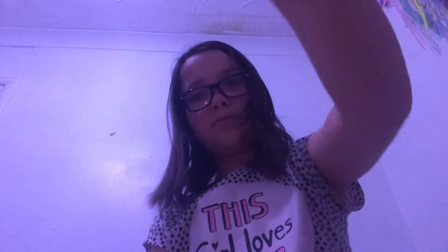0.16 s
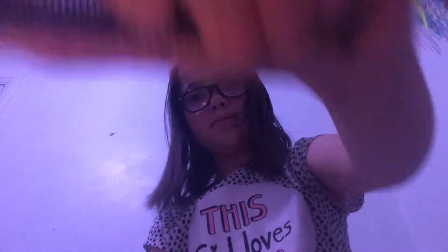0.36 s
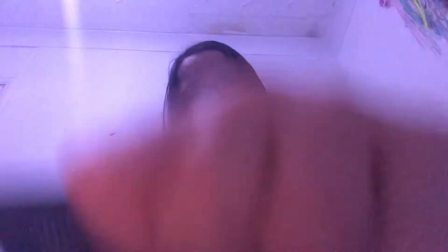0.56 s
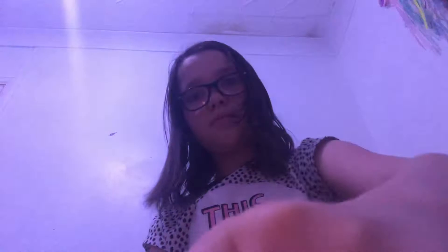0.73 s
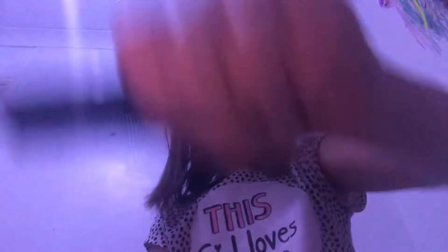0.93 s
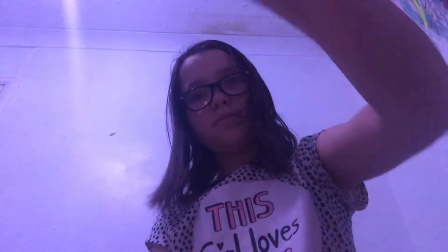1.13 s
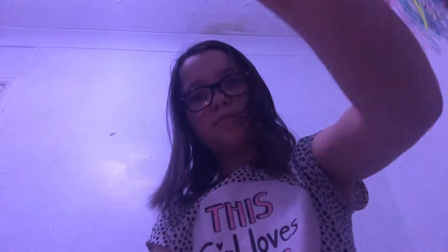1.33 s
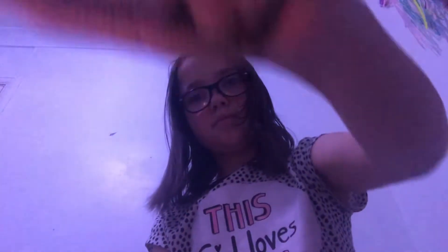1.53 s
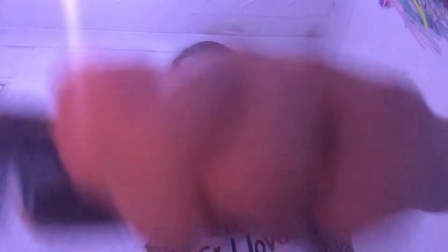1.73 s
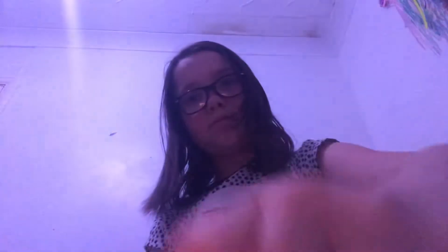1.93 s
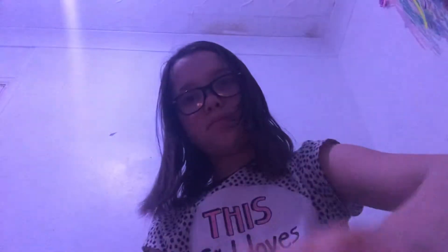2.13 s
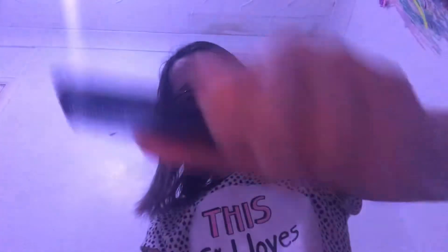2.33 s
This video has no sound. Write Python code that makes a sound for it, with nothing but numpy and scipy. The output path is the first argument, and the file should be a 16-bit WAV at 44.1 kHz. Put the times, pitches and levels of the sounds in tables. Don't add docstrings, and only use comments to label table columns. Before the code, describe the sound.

Comb teeth snap in two fast, ratchety bursts right at the microphone over a low hum

```python
import sys
import numpy as np
from scipy import signal
from scipy.fft import rfft, irfft
from scipy.io import wavfile
from scipy.ndimage import uniform_filter1d, minimum_filter1d

SR = 44100
rng = np.random.default_rng(int(sys.argv[2]) if len(sys.argv) > 2 else 0)


def wav_record(signal):
    frames = np.transpose(np.atleast_2d(signal))
    bounded = np.clip(frames, -1, 1)
    quanta = np.round(bounded * 32767).astype(np.int16)
    wavfile.write(sys.argv[1], SR, quanta)


def invert_db(x):
    u = np.asarray(x, float) / 20
    return 10 ** u


N = 108618
LEAD = 32

# frequency in Hz, level in dB.
SHUT_GATE = [(110, 1.5), (200, -7.5), (600, -7.5), (2000, -8), (6000, -11.5), (10000, -6.5), (16000, -2.5)]


def read(points, hz):
    f, value = np.transpose(points)
    return np.interp(np.log(hz + 1), np.log(f + 1), value)


def colour(x, points):
    gain = invert_db(read(points, np.fft.rfftfreq(len(x), 1 / SR)))
    return irfft(rfft(x) * gain, len(x))


def mode(f, hz, width_hz):
    return 1j * f * width_hz / (hz ** 2 - f ** 2 + 1j * f * width_hz)


def add(mix, s, sound):
    part = mix[round(s * SR) - LEAD:][:len(sound)]
    part += sound[:len(part)]


def snap(db, tooth_hz, ring_db, panel_db, panel_hz, dead_hz, spine_db, treble_db, chance, close):
    # frequency in Hz, level in dB.
    tick = [(200, -14), (600, -18.5), (2000, -9.5), (4000, -7), (7800, -7.5), (10000, -18), (13500, -14.5),
            (16000, -22)]
    # frequency in Hz, width in Hz, level in dB.
    spine = [(3740, 714, -7), (4870, 260, -10), (7710, 860, -11.5)]
    f = np.fft.rfftfreq(1024, 1 / SR)
    t = (np.arange(1024) - LEAD) / SR

    def delay(s):
        return np.exp(-2j * np.pi * f * s)

    first_bounce = 0.2 * delay(0.000214 * (1 + 0.2 * chance[0]))
    second_bounce = 0.66 * delay(0.00033 + 0.0001 * chance[4])
    body = invert_db(read(tick, f)) * (1 - first_bounce + second_bounce)
    for (hz, width_hz, spine_mode_db), c in zip(spine, chance[1:4]):
        body = body + invert_db(spine_mode_db + spine_db + 0.71 * c) * mode(f, hz * (1 + 0.026 * c), width_hz)
    body = invert_db(treble_db * np.clip(np.log2((f + 1) / 3500), 0, 1)) * body
    fall_db = np.where(f < panel_hz, 15, 14)
    body = body + invert_db(panel_db - fall_db * np.log2((f + 1) / panel_hz) ** 2)

    lag_s = 0.000887 * (1000 / np.maximum(f, 150.0)) ** 1.103
    late = np.exp(-2j * np.pi * np.cumsum(lag_s + LEAD / SR) * f[1])
    ring = irfft(invert_db(4.5 + ring_db) * mode(f, tooth_hz, 200) * late)
    damp_s = 0.0036
    damped_ring = ring / (1 + (np.maximum(t, 0) / damp_s) ** 12)
    whole = rfft(damped_ring) - body * late

    # frequency in Hz, width in Hz, depth
    nulls = []
    for beside, c in zip((0.832, 1.11), chance[5:]):
        nulls.append((tooth_hz * beside, 173, np.clip(0.41 + 0.23 * c, 0, 1)))
    nulls.append((dead_hz * (1 + 0.02 * chance[2]), 450, 0.92))
    nulls.append((9850 * (1 + 0.02 * chance[3]), 900, 0.92))
    for hz, width_hz, depth in nulls:
        whole = whole * (1 - close * depth * mode(f, hz, width_hz))
    return invert_db(db - 13.0) * 40 * irfft(whole)


def thump(hz, db):
    t = np.arange(3000) / SR
    peak_s = 0.0069
    swell = np.e * t / peak_s * np.exp(-t / peak_s)
    return invert_db(db) * swell * np.sin(2 * np.pi * hz * t)


def comb(chance, close):
    # start in seconds, peak in dB, tooth pitch in Hz,
    # tooth ring in dB, panel in dB.
    stroke_1 = [(0.2593, -30, 2980, 5.5, 2), (.277, -29, 2920, 3, 2), (0.3689, -22, 2850, -3.5, 1.5),
                (0.3855, -19, 3620, 0, 0), (.411, -21, 3290, -1.5, 1.5), (0.4467, -22.5, 2990, 4.5, 3),
                (0.4722, -21, 3050, 0.5, 0), (0.4925, -21.5, 2960, 4, 1.5), (0.5638, -21.5, 2950, 1.5, -7),
                (0.5861, -20.5, 2820, 3, -7), (0.6073, -20.5, 2940, 1.5, -6.5),
                (0.6466, -21.5, 2730, 2.5, -8.5), (0.7075, -24, 2690, 2, -4.5)]
    stroke_2 = [(1.2662, -38.5, 3140, 2.5, 1), (1.3549, -32.5, 3220, 8.5, -2.5),
                (1.378, -37.5, 3080, 8, 4.5), (1.557, -24, 2970, 3, -8), (1.5745, -24, 2820, 5.5, -7.5),
                (1.594, -19.5, 2830, 2.5, -9.5), (1.615, -22, 2650, 4, -6), (1.6395, -19, 2760, 0, -6.5),
                (1.665, -19.5, 2590, 2.5, -5.5), (1.697, -21.5, 2590, 2, -3.5),
                (1.736, -22.5, 2540, 2.5, 1), (1.833, -24.5, 2620, 5.5, 1), (1.851, -24.5, 2475, 2.5, 0.5)]
    touches = [
        (0.2097, -40, 3360, -6, 1),
        (0.773, -42, 3000, -7, -15),
        (0.816, -44.5, 3140, -5, -9),
        (1.9912, -39.5, 2760, 1, -7),
        (2.002, -47, 2720, -4, 1),
        (2.4185, -43, 3440, -10, 24.5),
    ]
    # start in seconds, panel pitch in Hz, dead spot in Hz,
    # spine in dB, treble in dB.
    grips = [(0, 1550, 5800, -2, -5.5), (.3, 1350, 5370, -7, 0.5), (.54, 1200, 5440, -3, 1),
             (.63, 860, 5730, -6, -3), (1.2, 1320, 4770, 3, -4), (1.5, 1090, 4680, 4, -4),
             (1.68, 810, 6140, -2, -6), (1.9, 520, 4550, -3, -3.5), (2.3, 446, 5600, -5.5, -8)]
    # start in seconds, pitch in Hz, level in dB.
    thumps = [(.455, 110, -50.5), (.494, 164, -54), (1.598, 129, -54), (1.834, 160, -58), (1.85, 170, -55)]
    out = np.zeros(N)
    for row, c in zip(stroke_1 + stroke_2 + touches, chance):
        grip = [g for g in grips if g[0] <= row[0]][-1]
        add(out, row[0], snap(*row[1:], *grip[1:], c, close))
    for s, hz, db in thumps:
        add(out, s, close * thump(hz, db))
    return signal.lfilter(*signal.butter(2, 65, "high", fs=SR), out)


def room(x):
    # frequency in Hz, level in dB.
    sent_colour = [(300, 3.5), (1200, -4), (3000, -2.5), (5800, 2.5), (8000, -1.5), (13000, 2.5)]
    # frequency in Hz, time in seconds.
    dying_time = [(300, 0.71), (3000, 0.48), (12000, 0.57)]
    hz, t, z = signal.stft(rng.standard_normal(SR // 2), SR, nperseg=256)
    fading = z * invert_db(-60 * t / read(dying_time, hz)[:, None])
    tail = signal.istft(fading, SR, nperseg=256)[1]
    tail = tail * np.clip((np.arange(len(tail)) / SR - 0.003) / 0.0027, 0, 1)
    echo = signal.fftconvolve(colour(x, sent_colour), tail / np.linalg.norm(tail))[:N]
    return invert_db(-21) * echo


def waver():
    t = np.arange(N) / SR
    return sum(np.sin(2 * np.pi * (f * t + rng.random())) / np.sqrt(f) for f in np.geomspace(0.8, 12, 12))


def background():
    # frequency in Hz, average (rms) level in dB.
    hum_tones = [(99.8, -61), (143, -76), (199.6, -88.5)]
    # frequency in Hz, level in dB per Hz.
    hiss_colour = [(30, -41.5), (65, -13.5), (160, -20.5), (510, -28), (1280, -38), (7300, -45.5),
                   (15600, -52), (16100, -76)]
    t = np.arange(N) / SR
    hum = np.zeros(N)
    for hz, db in hum_tones:
        loudness = np.sqrt(2) * invert_db(db + 0.4 * waver())
        hum += loudness * np.sin(2 * np.pi * hz * t + 0.12 * waver())
    usual = invert_db(read(hiss_colour, np.linspace(1000, 15000, 50)).mean())
    hiss = colour(rng.standard_normal(N), hiss_colour) / usual
    return colour(hum + invert_db(-76.5) * hiss, [(hz, -db) for hz, db in SHUT_GATE])


def scene():
    chance = np.clip(rng.standard_normal((40, 7)), -1.5, 1.5)
    return (comb(chance, True) + room(comb(chance, False)) + background())[None]


def low_pass(x):
    return signal.sosfilt(signal.butter(12, 16980, fs=SR, output="sos"), x)


def record(dry):
    x = dry[0]
    open_db, opening_range_db, hold_s, shut_s = -43, 10.5, 0.047, 0.0027
    treble_power = uniform_filter1d(np.diff(x, prepend=0) ** 2, 88)
    level_db = 10 * np.log10(abs(treble_power) + 1e-12)
    want = np.clip((level_db - open_db + opening_range_db) / opening_range_db, 0, 1) ** 2.5
    hold = round(hold_s * SR)
    held = -minimum_filter1d(-want, hold, origin=(hold - 1) // 2)
    passing = -minimum_filter1d(-np.clip((level_db + 62.5) / 6, 0, 1), 260)
    shut_step = 1 / (shut_s * SR)
    shutting = signal.lfilter([shut_step], [1, shut_step - 1], held)
    opened = np.maximum(shutting, uniform_filter1d(passing, 60) * (held > 0))
    opened = np.maximum(opened, held)
    gated = opened * x + (1 - opened) * colour(x, SHUT_GATE)
    treble_edge = signal.firwin(511, 16900, window=("kaiser", 9), fs=SR)
    gated = signal.oaconvolve(gated, treble_edge, "same")
    return low_pass(gated[None])


dry = scene()
out = record(dry)
wav_record(out)
```